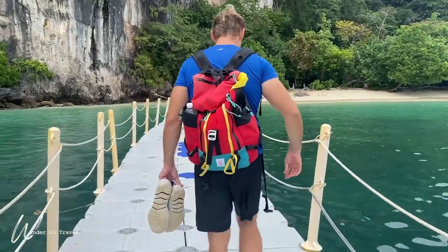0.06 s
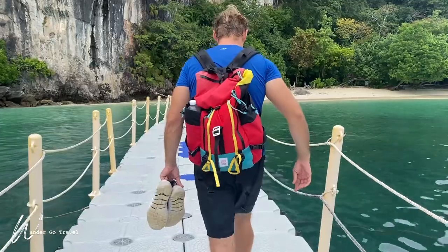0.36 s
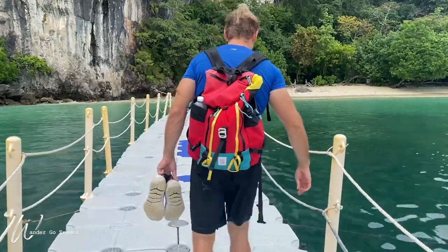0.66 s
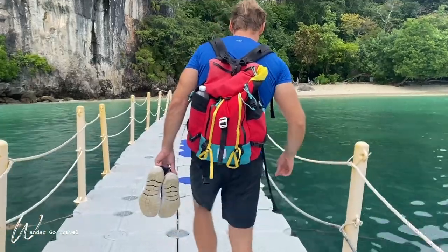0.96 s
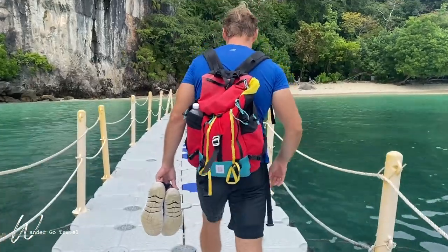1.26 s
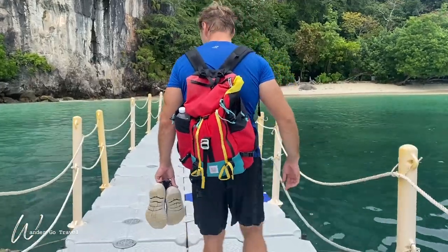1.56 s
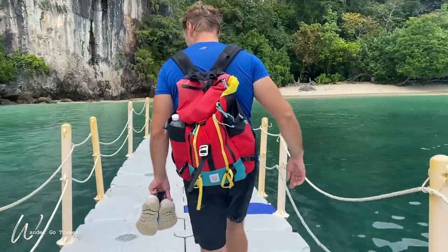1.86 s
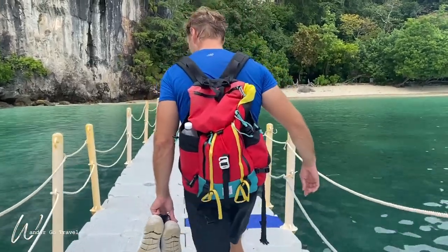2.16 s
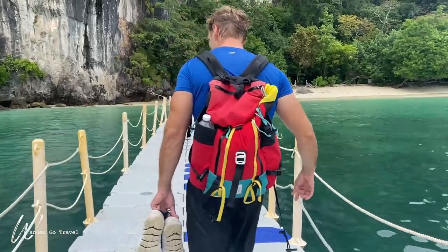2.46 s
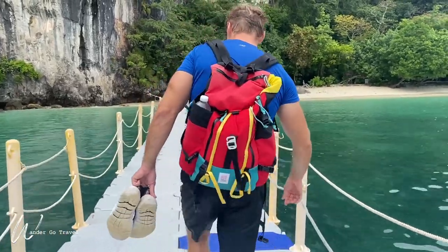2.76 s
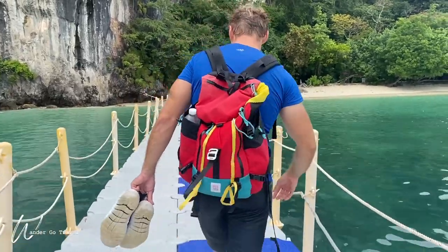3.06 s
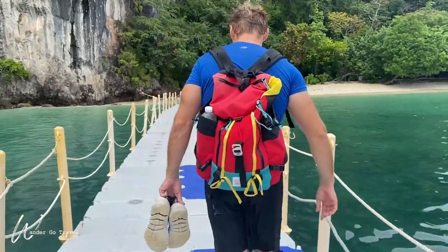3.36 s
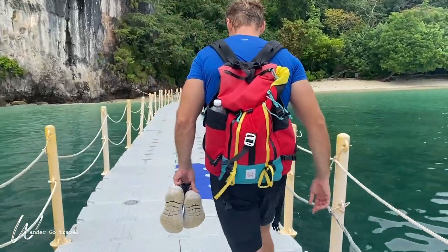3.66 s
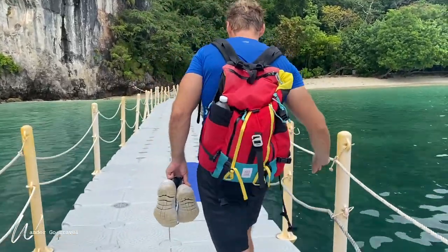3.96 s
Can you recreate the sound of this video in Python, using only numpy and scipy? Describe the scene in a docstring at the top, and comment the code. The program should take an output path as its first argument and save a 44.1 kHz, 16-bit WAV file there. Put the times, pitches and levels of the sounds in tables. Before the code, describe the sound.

Hollow plastic blocks boom and thump underfoot on a floating walkway, with a firm thump at 0.5 seconds and heavier ones around 2.5 and 3.3. Water surges between the blocks about once a second, sloshing, gurgling, slapping and fizzing. Close by, slightly left, blocks knock and small hard parts tick, and a plastic joint clacks at about 3.4 seconds. A faint breeze hisses throughout.

```python
"""Hollow booms and thumps underfoot, on a walk along a floating walkway of plastic blocks on a calm sea.
About once a second water surges between the blocks: it sloshes, bumps their walls, gurgles, slaps and
fizzes as pockets of air ring and burst. Close to the stereo microphone, mostly a little to the left,
blocks knock, small hard parts tick and a plastic joint clacks once. A light breeze hisses behind it all."""
import sys
import numpy as np
from scipy.fft import rfft, irfft, next_fast_len
from scipy.io import wavfile
from scipy.ndimage import map_coordinates

SR = 44100
rng = np.random.default_rng(int(sys.argv[2]) if len(sys.argv) > 2 else 0)


def generate_wav(signal):
    """Clip the signal to [-1, 1] and save it as 16-bit WAV at the path in sys.argv[1]."""
    frames = np.transpose(np.atleast_2d(signal))
    scaled = np.clip(frames, -1, 1) * 32767
    pcm = np.round(scaled).astype(np.int16)
    wavfile.write(sys.argv[1], SR, pcm)


N = 176400

# how hard the floats rock (time [s], level [dB])
ROCKING = [(0, -30.5), (.15, -30.5), (.46, -45), (.53, -28), (.66, -25), (.97, -38), (1.17, -37.5),
           (1.25, -29.5), (1.6, -28), (1.72, -27.5), (1.93, -21.5), (2.14, -33), (2.56, -18), (2.68, -19),
           (2.8, -26.5), (3.02, -22.5), (3.28, -22), (3.38, -16.5), (3.52, -19.5), (3.7, -28), (3.95, -16)]
# a float takes weight (time [s], level [dB], pitch [Hz])
THUMPS = [(0.324, -21.5, 77), (0.517, -10.5, 78), (1.034, -21, 106), (1.595, -13.5, 139),
          (1.804, -14.5, 100), (2.421, -9.5, 115), (2.544, -7.5, 79), (2.978, -9.5, 89),
          (3.348, -5.5, 74.5), (3.365, -6.5, 123), (3.473, -10.5, 62.5), (3.584, -14, 103),
          (3.943, -12.5, 64)]
# water surges between the floats (crest time [s], 20 dB rise [s], 20 dB fall [s], slosh [dB], gurgle [dB])
SURGES = [(0.08, 1.5, 0.27, -27.5, -44.5), (0.622, 0.23, 0.36, -21, -32.5), (1.395, 0.34, .5, -24, -38.5),
          (1.579, 0.5, 0.16, -20, -32), (1.759, 0.07, 0.45, -27, -43), (2.411, 0.2, 0.5, -25, -39.5),
          (2.55, 0.28, 0.3, -21.5, -36), (2.9, 0.97, 0.55, -30.5, -44), (3.19, 0.28, 0.44, -25, -37),
          (3.363, 0.12, 0.2648, -16.5, -28), (3.93, 0.33, 0.5, -23.5, -38)]
# water bumps the wall of a float (time [s], level [dB])
BUMPS = [(0.728, -22.5), (0.817, -26), (1.206, -21.5), (1.388, -19), (1.687, -27.5), (2.529, -19),
         (2.562, -18.5), (2.936, -25.5)]
# modes of a hollow float (pitch [Hz], relative level [dB])
HULL_MODES = [(243, -4.5), (304, -3), (395, -5.5), (470, -6.5)]
# single air pockets (time [s], level [dB], starting pitch [Hz])
PLIPS = [(0.039, -32, 1806), (0.057, -33.5, 1293), (0.548, -33, 1735), (0.641, -13, 312),
         (1.351, -15.5, 256), (1.573, -13, 409), (2.745, -28.5, 610), (2.932, -25, 502), (3.208, -17, 445),
         (3.579, -19.5, 250)]
# water slaps in the gaps (time [s], relative level [dB], starting pitch [Hz])
SLAPS = [(0.099, -25.5, 1104), (0.457, -34.5, 1220), (0.544, -24, 796), (0.581, -32, 729),
         (0.872, -26.5, 970), (1.192, -28.5, 883), (1.355, -33, 727), (1.492, -22.5, 1220),
         (1.559, -19, 1006), (2.334, -21.5, 896), (2.372, -25.5, 935), (3.156, -25.5, 980),
         (3.355, -21.5, 850)]
# how much spray is in the air (time [s], relative level [dB])
SPRAY = [(0, -47.5), (0.15, -55), (0.48, -53.5), (0.61, -43), (0.8, -50), (0.9, -48), (1.18, -49.5),
         (1.4, -48.5), (1.62, -43), (1.79, -45.5), (1.86, -54.5), (2.28, -49.5), (2.58, -45), (2.76, -51),
         (3.08, -54), (3.14, -43.5), (3.26, -51), (3.42, -36.5), (3.52, -47), (3.72, -53.5), (3.94, -45)]
# plastic knocks on plastic (time [s], relative level [dB])
KNOCKS = [(0.7918, -24.5), (0.804, -25), (1.2694, -20.5), (1.594, -23), (1.6873, -27.5), (1.7516, -25.5),
          (2.335, -25), (2.4725, -25), (2.586, -18.5), (2.891, -26.5), (3.2826, -24.5), (3.319, -21),
          (3.397, -20), (3.4241, -14.5), (3.926, -22.5)]
# small hard parts touch (time [s], level [dB], t60 [s])
TICKS = [(0.2394, -35.5, 0.037), (0.2793, -32.5, 0.025), (0.775, -33.5, 0.018), (0.82, -29, 0.027),
         (1.009, -22.5, 0.012), (1.0375, -22.5, 0.0079), (1.143, -33, 0.036), (1.812, -29.5, 0.02),
         (2.345, -29, 0.022), (2.587, -28, 0.043), (2.613, -32, 0.085), (2.707, -31, 0.061),
         (2.806, -26.5, 0.013), (3.283, -30.5, 0.027), (3.6022, -25, 0.013), (3.8495, -24.5, 0.018)]
# the two contacts of the joint's clack (time [s], level [dB])
CLACKS = [(3.439, -16), (3.4421, -21)]
# modes of the plastic joint (pitch [Hz], relative level [dB], t60 [s])
JOINT_MODES = [(1125, -9, 0.078), (1670, -7, 0.063), (2004, -3.5, 0.061), (2496, -1, 0.029),
               (3010, -2, 0.027), (4260, -3.5, 0.023), (6160, -1, 0.012), (7130, 4, 0.012)]

# colour of the booming blocks (frequency [Hz], relative level [dB])
BOOM_SPECTRUM = [(20, -26), (35, -21), (52, -3.5), (80, 0.5), (128, -1.5), (170, -11.5), (600, -87)]
# colour of big air pockets under the floats (frequency [Hz], relative level [dB])
SLOSH_SPECTRUM = [(70, -4.5), (200, -1), (310, -5), (450, -7), (620, -21), (1200, -30), (3000, -78)]
# colour of bubbles and splashes in the gaps (frequency [Hz], relative level [dB])
GURGLE_SPECTRUM = [(250, -23), (520, -3.5), (750, -2.5), (1050, 1), (1400, -7.5), (1800, -9.5),
                   (2600, -14.5), (6000, -47)]
# colour of fine spray (frequency [Hz], relative level [dB])
FIZZ_SPECTRUM = [(700, -31), (1600, -3.5), (2500, -2), (4200, -2.5), (6000, -7.5), (8000, -4.5),
                 (11000, -10.5), (13000, -15.5), (15500, -12.5)]
# colour of plastic striking plastic (frequency [Hz], relative level [dB])
KNOCK_SPECTRUM = [(500, 3.5), (1500, 2), (2400, 2.5), (3300, -2.5), (7500, -12), (10000, -18.5),
                  (15500, -22)]
# colour of the small hard parts (frequency [Hz], relative level [dB])
TICK_SPECTRUM = [(1000, 1.5), (4800, -1.5), (6500, -2), (8100, 4), (10500, -2.5), (13000, -9.5),
                 (15500, -7)]
# colour of the wind (frequency [Hz], relative level [dB])
BREEZE_SPECTRUM = [(25, -27), (80, -2), (250, -3), (1100, -6.5), (2500, -8), (15000, -38)]

THUMP_RISE_S, THUMP_T60_S = 0.00064, 0.13
CALM_SLOSH_DB, CALM_GURGLE_DB = -41.5, -52  # between surges
DRIP_DB = -14.5  # ringing drips against the gurgle
HULL_RISE_S, HULL_T60_S = 0.0012, 0.13
PLIP_RISE_S, PLIP_T60_S, PLIP_GLIDE_PER_S = 0.00064, 0.095, 0.95
SLAP_RISE_S, SLAP_T60_S, SLAP_GLIDE_PER_S = 0.0007, 0.056, 4.3
KNOCK_T60_S, CRACK_T60_S = 0.059, 0.058
BOOM_GAIN_DB, SLAP_GAIN_DB, FIZZ_GAIN_DB, KNOCK_GAIN_DB = -0.5, -2.5, 0.5, -4.5
BREEZE_GAIN_DB = -53
# above the knee the microphone's right port lags the left and hears more treble
PORT_KNEE_HZ, PORT_LAG_S, PORT_TILT_DB = 6700, 0.000227, 3.5
LOW_CUT_HZ, TOP_HZ = 25.6, 15900


def floats():
    """Underfoot, the hollow blocks boom as they rock and thump when they take weight."""
    rings = bubbles(42.6, 266, cycles=9.3, glide=0, spread_db=1.0, count=3400)
    boom = on_noise_bed(rings, BOOM_SPECTRUM, noise_db=-3.5) * amp(curve(ROCKING) + BOOM_GAIN_DB)
    t = np.arange(SR // 4) / SR
    for s, db, hz in THUMPS:
        add(boom[0], s, struck(t, db, THUMP_RISE_S, THUMP_T60_S) * np.sin(2 * np.pi * hz * t))
    return placed(boom, left_db=0.5, side_db=-13)


def surges():
    """Water swells and drains: big air pockets slosh under the floats, small bubbles gurgle in the gaps."""
    t = np.arange(N) / SR
    slosh_power, gurgle_power = amp(CALM_SLOSH_DB) ** 2, amp(CALM_GURGLE_DB) ** 2
    for crest, rise, fall, slosh_db, gurgle_db in SURGES:
        swell_db = -20 * np.maximum((crest - t) / rise, (t - crest) / fall)
        slosh_power += amp(slosh_db + swell_db) ** 2
        gurgle_power += amp(gurgle_db + swell_db) ** 2
    pockets = bubbles(131.8, 720, cycles=12.5, glide=0.12, spread_db=2.0, count=3000)
    slosh = on_noise_bed(pockets, SLOSH_SPECTRUM, noise_db=-7.5)
    small_bubbles = bubbles(452, 3160, cycles=20, glide=0.12, spread_db=5.0, count=3800)
    gurgle = on_noise_bed(small_bubbles, GURGLE_SPECTRUM, noise_db=-6.5)
    drips = amp(DRIP_DB) * bubbles(1404, 4360, cycles=60, glide=0.072, spread_db=4.5, count=900)
    return (placed(slosh * np.sqrt(slosh_power), left_db=1.3, side_db=-12)
            + placed((gurgle + drips) * np.sqrt(gurgle_power), left_db=4, side_db=-5))


def bumps():
    """Water strikes the wall of a float, and the hollow block rings a little differently each time."""
    hull, t = np.zeros(N), np.arange(SR // 4) / SR
    for s, db in BUMPS:
        fade = struck(t, db, HULL_RISE_S, HULL_T60_S)
        for hz, mode_db in HULL_MODES:
            pitch = hz * (1 + 0.027 * rng.standard_normal())
            gain = amp(mode_db + rng.normal(0, 1))
            add(hull, s, fade * gain * np.sin(2 * np.pi * (pitch * t + rng.random())))
    return hull * amp([[1], [-1]])  # just left of centre


def plips():
    """A pocket of air pinches off and rings, its pitch rising a little."""
    rings, t = np.zeros(N), np.arange(SR // 8) / SR
    for s, db, hz in PLIPS:
        add(rings, s, struck(t, db, PLIP_RISE_S, PLIP_T60_S) * rising_sine(t, hz, PLIP_GLIDE_PER_S))
    return rings * amp([[1], [-1]])  # just left of centre


def slaps():
    """Water slaps in the gaps: each is a short splash with a ringing bubble that rises in pitch."""
    rings, envelope, t = np.zeros((2, N)), np.zeros(N), np.arange(SR // 10) / SR
    for s, db, hz in SLAPS:
        fade = struck(t, db + SLAP_GAIN_DB, SLAP_RISE_S, SLAP_T60_S)
        add(rings[0], s, fade * rising_sine(t, hz, SLAP_GLIDE_PER_S))
        add(envelope, s, fade)
    splash = amp(-2.5) * envelope * noise(GURGLE_SPECTRUM)
    return placed(rings + splash, left_db=2.5, side_db=-6)


def fizz():
    """Left of centre, a fine spray of bursting bubbles crackles in quick clumps."""
    pops = bubbles(1310, 22100, cycles=15, glide=0, spread_db=5.0, count=2600)
    spray = on_noise_bed(pops, FIZZ_SPECTRUM, noise_db=1.3)
    level_db = curve(SPRAY) + FIZZ_GAIN_DB + 3.3 * wobble(knots_per_s=45)
    return placed(spray * amp(level_db), left_db=4, side_db=-30)


def fittings():
    """The blocks knock dully together, and small hard parts tick brightly close to the microphone."""
    contacts = [(s, db + KNOCK_GAIN_DB, KNOCK_T60_S) for s, db in KNOCKS]
    knocks = bursts(contacts, KNOCK_SPECTRUM, rise_s=0.00065)
    ticks = bursts(TICKS, TICK_SPECTRUM, rise_s=0.000058)
    return placed(knocks, left_db=2.5, side_db=-5.5) + placed(ticks, left_db=3.5, side_db=-14.5)


def clack():
    """A plastic joint snaps over in two quick contacts; each cracks and sets its modes ringing."""
    crack = bursts([(s, db, CRACK_T60_S) for s, db in CLACKS], KNOCK_SPECTRUM, rise_s=0.00018)
    ring, t = np.zeros((2, N)), np.arange(SR // 10) / SR
    for s, db in CLACKS:
        for hz, mode_db, t60 in JOINT_MODES:
            fade = amp(db + mode_db + rng.normal(0, 1) - 60 * t / t60)
            add(ring[0], s, fade * np.sin(2 * np.pi * (hz * t + rng.random())))
    return placed(crack + ring, left_db=2, side_db=-5.5)


def breeze():
    """Light wind over the sea, a wide hiss in the background."""
    return placed(noise(BREEZE_SPECTRUM) * amp(BREEZE_GAIN_DB), left_db=-1, side_db=3.5)


def bubbles(lo_hz, hi_hz, cycles, glide, spread_db, count):
    """Two tracks of random damped sines; each dies 60 dB in `cycles` periods and rises by share `glide`."""
    pitch_draw, size_draw, time_draw = np.hsplit(rng.random((count, 4)), 4)[:3]
    hz = lo_hz * (hi_hz / lo_hz) ** pitch_draw
    n = np.arange(min(int(cycles * SR / lo_hz), SR // 8))
    age = hz * n / SR / cycles  # 1 at 60 dB down
    size = amp(-spread_db * np.log(1 - 0.97 * size_draw))  # many quiet, a few loud
    fade = size * amp(-60 * age) * (1 - np.exp(-2 * age * cycles))
    rings = fade * rising_sine(age, cycles, glide)
    at = ((time_draw * 2 * N).astype(int) + n) % (2 * N)
    return unit(np.bincount(at.ravel(), rings.ravel(), 2 * N).reshape(2, N))


def on_noise_bed(grains, spectrum, noise_db):
    """Grains over noise of the same colour, at rms 1."""
    return unit(coloured(grains, spectrum) + amp(noise_db) * noise(spectrum))


def bursts(contacts, spectrum, rise_s):
    """A short dry burst of noise for each contact (time [s], level [dB], t60 [s])."""
    envelope, t = np.zeros(N), np.arange(SR // 10) / SR
    for s, db, t60 in contacts:
        add(envelope, s, struck(t, db, rise_s, t60))
    return envelope * noise(spectrum)


def struck(t, db, rise_s, t60_s):
    """Envelope of a blow: a quick rise, and a fall of 60 dB in t60_s."""
    return amp(db - 60 * t / t60_s) * (1 - np.exp(-t / rise_s))


def rising_sine(t, pitch, glide):
    """A sine that gains the share `glide` of its starting pitch per unit of t."""
    return np.sin(2 * np.pi * pitch * t * (1 + glide * t / 2))


def placed(pair, left_db, side_db):
    """Stereo from a direct track and a diffuse one at side_db, with left louder than right by left_db."""
    direct, side = pair[0], amp(side_db) * pair[1]
    return np.array([direct + side, direct - side]) * amp([[left_db / 2], [-left_db / 2]])


def noise(spectrum):
    """Two independent tracks of coloured noise."""
    return coloured(rng.standard_normal((2, N)), spectrum)


def coloured(x, spectrum):
    """x shaped by (frequency [Hz], level [dB]) points on a log axis, at rms 1."""
    points_hz, db = np.transpose(spectrum)
    return unit(filtered(x, lambda hz: amp(np.interp(np.log(hz + 1), np.log(points_hz), db))))


def filtered(x, response):
    """x through a complex frequency response."""
    size = next_fast_len(N + SR // 2)
    return irfft(rfft(x, size) * response(np.fft.rfftfreq(size, 1 / SR)), size)[..., :N]


def curve(points):
    """(time [s], level [dB]) points joined into one level per sample."""
    return np.interp(np.arange(N) / SR, *np.transpose(points))


def wobble(knots_per_s):
    """A smooth random curve."""
    return map_coordinates(rng.standard_normal(2000), [np.arange(N) * knots_per_s / SR], mode="wrap")


def add(track, s, sound):
    """Mix a sound into the track at s seconds."""
    part = track[int(s * SR):][:len(sound)]
    part += sound[:len(part)]


def amp(db):
    """Decibels to gain."""
    return 10 ** (np.asarray(db) / 20)


def unit(x):
    """Scaled to rms 1."""
    return x / np.sqrt(np.mean(x ** 2) + 1e-20)


def scene():
    """Blocks, water and air as heard from the walkway."""
    return floats() + surges() + fizz() + plips() + bumps() + slaps() + fittings() + clack() + breeze()


def record(dry):
    """The microphone loses deep bass and the very top; its ports part in phase and level in the treble."""
    def response(hz):
        sides = np.array([[1], [-1]])  # left, right
        phase = np.pi * PORT_LAG_S * np.maximum(hz - PORT_KNEE_HZ, 0)
        tilt_db = -PORT_TILT_DB / 2 * np.minimum(phase, 1)
        ports = np.exp(1j * phase * sides) * amp(tilt_db * sides)
        low_cut = hz ** 2 / (hz ** 2 - LOW_CUT_HZ ** 2 - 1j * np.sqrt(2) * hz * LOW_CUT_HZ)
        return low_cut ** 2 * ports * (hz < TOP_HZ)
    return filtered(dry, response)


dry = scene()
out = record(dry)
generate_wav(out)
```